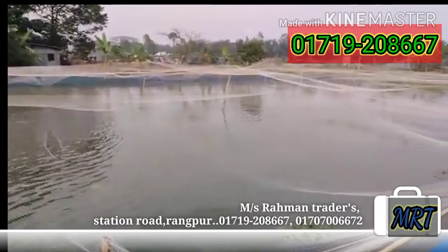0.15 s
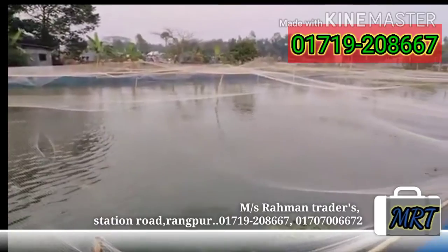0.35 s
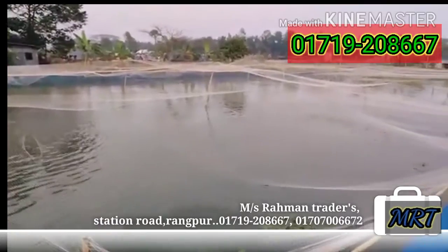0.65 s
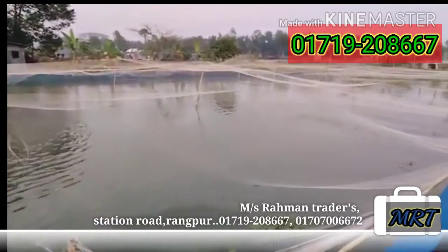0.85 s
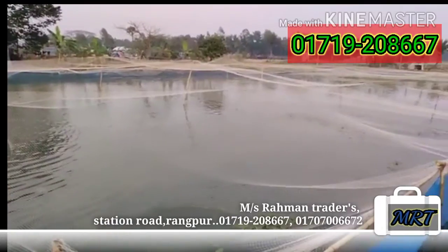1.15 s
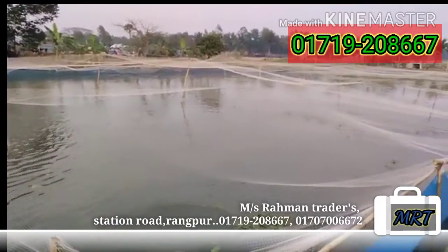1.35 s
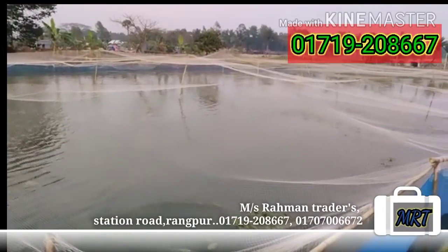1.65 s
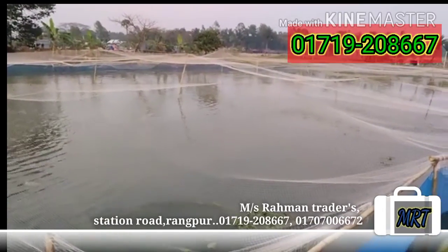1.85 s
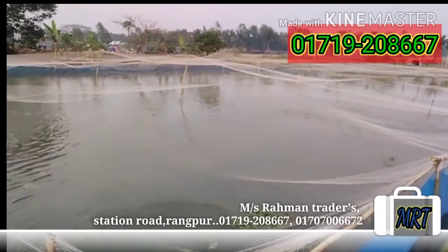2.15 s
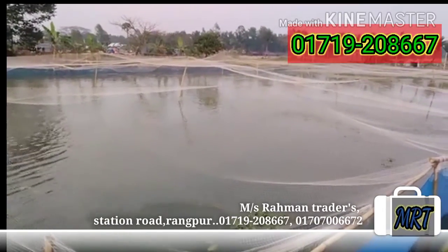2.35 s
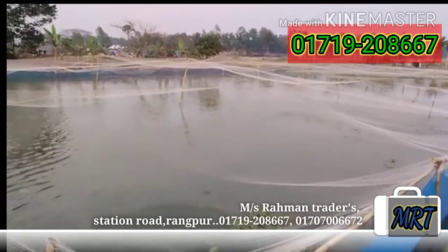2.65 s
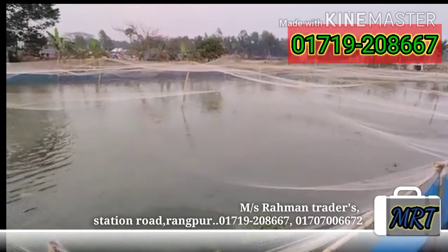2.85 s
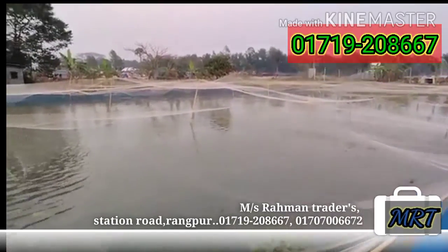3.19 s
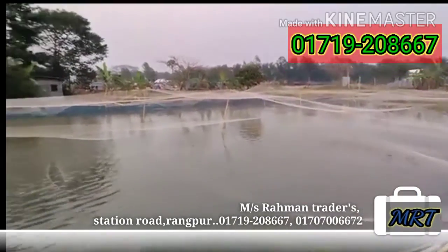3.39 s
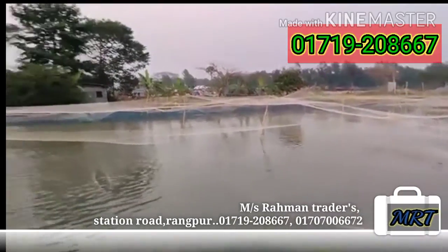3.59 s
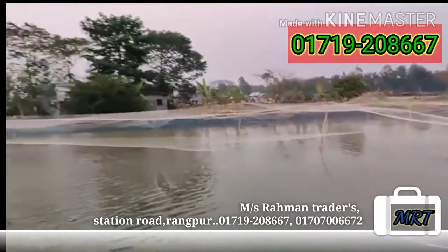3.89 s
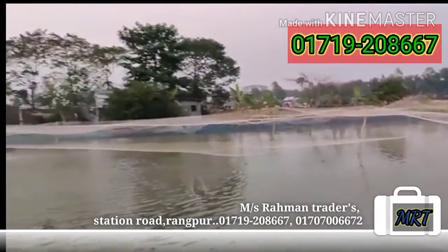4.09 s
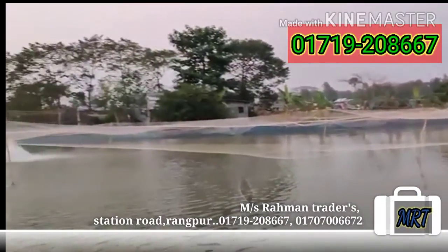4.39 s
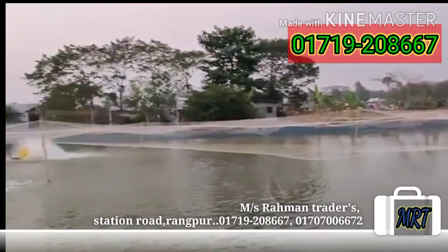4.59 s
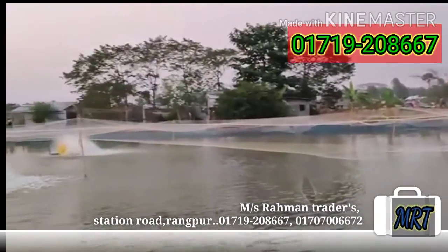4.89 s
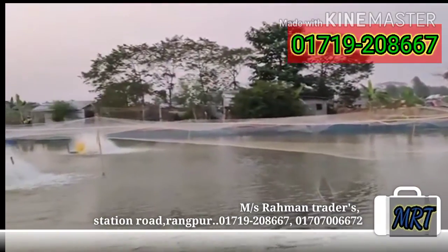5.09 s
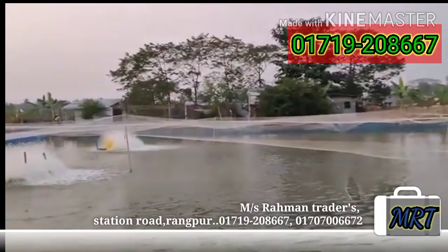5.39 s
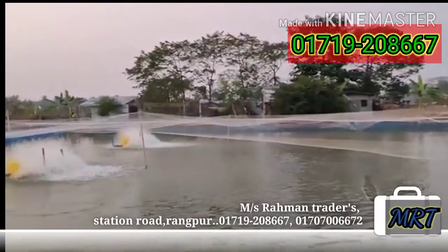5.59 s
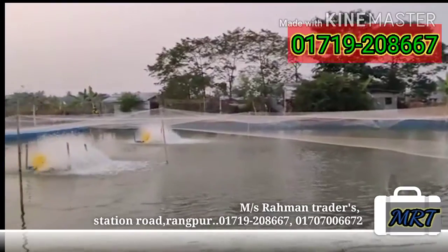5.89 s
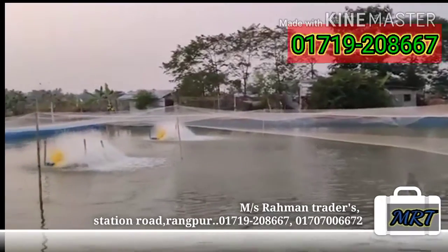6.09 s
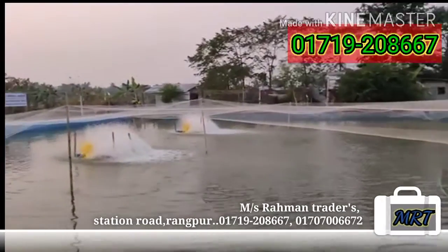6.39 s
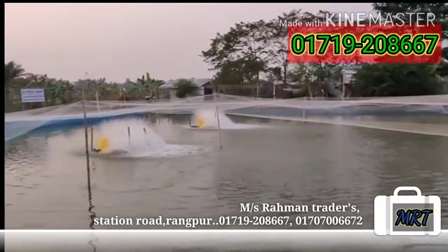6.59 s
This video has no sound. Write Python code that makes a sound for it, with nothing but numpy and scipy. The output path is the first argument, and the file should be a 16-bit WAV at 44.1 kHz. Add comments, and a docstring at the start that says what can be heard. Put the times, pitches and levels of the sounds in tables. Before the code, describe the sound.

Paddle wheel aerators churn a fish pond some way off, a dense steady rush of spray over a low wavering motor and gear hum.

```python
"""A dense rush of spray over the drone of motors and gears: paddle wheel aerators on a fish pond, some way off.
Spray is noise, drops and ringing bubbles, made uneven in time and pitch; motors and gears are wavering sines.
A hand-held phone with a microphone at each end turns slowly towards them: colour, lag and likeness of the
channels change. A few close drops splat during the turn; near the end the gear lines sink."""
import sys
import numpy as np
from scipy import signal
from scipy.fft import rfft, irfft, next_fast_len
from scipy.io import wavfile
from scipy.ndimage import map_coordinates

SR = 44100
rng = np.random.default_rng(int(sys.argv[2]) if len(sys.argv) > 2 else 0)


def transcribe(signal):
    """Save signal, clipped to [-1, 1], as a 16-bit WAV file at the path in sys.argv[1]."""
    frames = np.atleast_2d(signal).T
    limited = np.clip(frames, -1, 1)
    pcm = np.round(limited * 32767).astype(np.int16)
    wavfile.write(sys.argv[1], SR, pcm)


N = 297234
T_S = np.arange(N) / SR


def from_db(db):
    """Decibels to amplitude gain."""
    return 10 ** (np.asarray(db) / 20)


def at_hz(points, hz, column=1):
    """Table column interpolated over log frequency."""
    table = np.array(points)
    return np.interp(np.log(hz), np.log(table[:, 0]), table[:, column])


def drift(corner_hz):
    """Slow chance: noise at every 40th sample through a double one-pole low-pass; spread 1."""
    r = np.exp(-2 * np.pi * corner_hz * 40 / SR)
    noise = rng.standard_normal(N // 40 + 2002)
    slow = signal.lfilter([1], [1, -2 * r, r * r], noise)[2000:]
    slow = (slow - slow.mean()) / slow.std()
    return np.interp(np.arange(N) / 40, np.arange(len(slow)), slow)


def patches(corner_hz, hz, frames, step_s):
    """Slow chance over time, independent in every sixth of an octave; spread 1."""
    r = np.exp(-2 * np.pi * corner_hz * step_s)
    noise = rng.standard_normal((60, frames + 200))
    slow = signal.lfilter([1], [1, -2 * r, r * r], noise)[:, 200:]
    row = np.clip(6 * np.log2(hz / 30), 0, 59).astype(int)
    return (slow / slow.std())[row]


def colour(x, gain):
    """Filters x by a complex gain(Hz)."""
    size = next_fast_len(N)
    hz = np.maximum(np.arange(size // 2 + 1) * SR / size, 1)
    return irfft(rfft(x, size) * gain(hz), size)[..., :N]


def delayed(x, lag_ms):
    """Reads x later by a lag that may change."""
    return map_coordinates(x, [np.arange(N) - lag_ms * SR / 1000 + np.zeros(N)], order=3, mode="nearest")


# course of the turn, 0 away to 1 facing: t/s, share/1
TURN = [(0, 0.02), (2.0, 0), (2.9, 0.02), (3.4, 0.09), (3.9, 0.31), (4.4, 0.48), (4.9, .66), (5.5, .78),
        (6.1, 0.82), (6.74, 0.89)]


def turn():
    """Share of the turn, sample by sample."""
    return np.interp(T_S, *np.transpose(TURN))


def random_hits(rate_hz, mean_db):
    """Impulses at random moments and signs in three streams; dB sizes exponential, capped at 5 means."""
    sizes = from_db(mean_db * np.minimum(rng.exponential(1, (3, N)), 5))
    return sizes * rng.choice([-1, 1], (3, N)) * (rng.random((3, N)) < rate_hz / SR)


BUBBLES_PER_S, BUBBLE_CYCLES = 900, 27  # per stream; cycles to -60 dB
BUBBLE_SHARE = 0.16  # power, relative to the flat rush in the bubble band
BUBBLE_LOW_HZ, BUBBLE_HIGH_HZ = 684, 5320


def bubbles():
    """Trapped air bursts at random and rings at 18 pitches over about three octaves, each stream its own."""
    hits = random_hits(BUBBLES_PER_S, 1.9)
    dealt, out = rng.integers(0, 18, (3, N)), 0
    for k, hz in enumerate(np.geomspace(BUBBLE_LOW_HZ, BUBBLE_HIGH_HZ, 18)):
        r, w = from_db(-60 * hz / BUBBLE_CYCLES / SR), 2 * np.pi * hz / SR
        struck = hits * (dealt == k) + 1e-18  # offset avoids denormals
        out = out + w * signal.lfilter([0, np.sin(w)], [1, -2 * r * np.cos(w), r * r], struck)
    band_share = (BUBBLE_HIGH_HZ - BUBBLE_LOW_HZ) * 2 / SR
    return np.sqrt(BUBBLE_SHARE * band_share) * out / out.std()


DROPS_PER_S, DROP_SHARE = 3000, 0.011  # per stream; share of noise-plus-drops power


def flat_water():
    """Noise, drop impulses and bubbles in three independent streams."""
    drops = random_hits(DROPS_PER_S, 4.0)
    noise = np.sqrt(1 - DROP_SHARE) * rng.standard_normal((3, N))
    return noise + np.sqrt(DROP_SHARE) * drops / drops.std() + bubbles()


# unevenness of the rush, last column for the unshared streams when away:
# f/Hz, surge spread/dB, paddle beat/dB, quick level change spread/dB
UNEVEN = [(200, 2, 2, 1.0), (700, 0.8, 0.5, 3.5), (1380, 2.5, 2, 4), (2710, 1.5, 0.5, 5.5),
          (3500, 2.5, 1.5, 5.5), (5100, 1.15, 0.3, 0.9), (9200, 1.62, 0.3, 0.27), (14000, 2, 1, 0.5)]
PADDLES_PER_S, ODD_BLADE_SHARE = 14.0, 0.43  # mean rate; every second blade throws more water
SURGE_CORNER_HZ, QUICK_CORNER_HZ = 16.8, 12.7


def rush(turned):
    """Three streams (common, left only, right only), uneven in patches of time and pitch."""
    flat = flat_water()
    hz, s, cells = signal.stft(flat, SR, nperseg=512)
    hz = np.maximum(hz, 30)
    surge_db, beat_db, quick_db = (at_hz(UNEVEN, hz, column=k)[:, None] for k in (1, 2, 3))
    surges_db = np.array([surge_db * patches(SURGE_CORNER_HZ, hz, len(s), s[1]) for _ in flat])

    # the paddle rate wanders a little
    strikes = np.interp(s, T_S, np.cumsum(PADDLES_PER_S + 0.38 * drift(0.34)) / SR)
    # the beat has a random phase in each half octave
    offsets = rng.random(24)[(2 * np.log2(hz / 30)).astype(int), None]
    stroke = strikes + offsets
    beat = np.sin(2 * np.pi * stroke) + ODD_BLADE_SHARE * np.sin(np.pi * stroke)

    # quick patchy level changes in the unshared streams, fading over the turn
    quick_db = quick_db * (1 - np.interp(s, T_S, turned))
    mean_db = quick_db ** 2 * np.log(10) / 20  # keeps mean power
    cells[1:] *= from_db(quick_db * patches(QUICK_CORNER_HZ, hz, len(s), s[1]) - mean_db)
    cells = cells * from_db(surges_db + beat_db * beat)
    return signal.istft(cells, SR, nperseg=512)[1][:, :N]


# further phase between the channels in the treble: f/Hz, phase/rad
TREBLE_PHASE = [(4300, -0.021), (5000, -0.7), (5900, -0.1), (6200, -2), (6800, -3), (7200, 0.65),
                (8000, 1.5)]
FLIP_SHARPNESS, FIRST_FLIP_HZ = 2.7, 70  # abruptness of the band edges; width of the first


def channel_phase(hz, lag_ms, first_hz, band_hz):
    """Phase between the channels: a delay in the bass, then alternately opposite and in-phase bands."""
    bands = np.clip((hz - first_hz) / band_hz - .5, 0, 3)
    flip = np.sin(np.pi * bands) ** 2
    steps = np.round(bands) + .5 * np.sign(np.sin(2 * np.pi * bands)) * flip ** FLIP_SHARPNESS
    banded = .5 + .5 * np.tanh((hz - first_hz) / FIRST_FLIP_HZ)
    delay_phase = 2 * np.pi * hz * lag_ms / 1000
    return (1 - banded) * delay_phase + banded * np.pi * (1 + steps) + at_hz(TREBLE_PHASE, hz)


# rows away, half turned, facing: right bass lag/ms, first opposite-phase band start/Hz, band width/Hz
BEARINGS = [(0.36, 1210, 933), (0.24, 1360, 910), (0.033, 1540, 690)]
# churned water in the bass, before turn gain and ports: f/Hz, level/dB per Hz
CHURN = [(15, -74), (45, -71), (80, -67), (110, -65.5), (170, -69), (230, -66), (280, -61.5), (350, -64)]
# spray at each microphone by bearing, likewise: f/Hz, level/dB per Hz
LEFT_AWAY = [(450, -63), (540, -69), (640, -62.5), (760, -71), (1000, -72), (1280, -69.5), (1700, -68),
             (2170, -74), (2360, -65), (2900, -70), (3500, -73), (3990, -74), (4360, -68), (4800, -74),
             (5190, -69), (6900, -79), (7500, -80), (8030, -85), (9560, -82), (13560, -91), (14800, -86)]
LEFT_HALF = [(450, -65.5), (490, -73), (640, -68.5), (760, -71.5), (900, -65), (1530, -80.5), (1990, -70),
             (2170, -75), (2580, -66.5), (3660, -69.5), (4400, -70), (4800, -68), (5200, -68.5),
             (6180, -69.5), (7400, -78), (8200, -80), (8760, -83), (11390, -79.5), (14800, -88)]
LEFT_FACING = [(450, -64), (540, -75), (640, -63.5), (1400, -71), (2000, -65), (2400, -71.5), (2750, -63),
               (3500, -75), (4050, -69), (4600, -69), (5660, -67.5), (6200, -64.5), (7360, -79),
               (8760, -79), (12430, -76.5), (13560, -89), (14800, -89)]
RIGHT_AWAY = [(450, -65), (640, -63.5), (830, -72), (990, -69), (1280, -69.5), (1530, -69.5), (2580, -67.5),
              (3500, -71.5), (5190, -74.5), (6740, -71.5), (11390, -80), (13560, -75), (14800, -78)]
RIGHT_HALF = [(450, -66), (700, -70), (760, -74), (830, -64.5), (990, -67), (1180, -67.5), (2170, -71),
              (2580, -69), (4360, -76), (6180, -70.5), (8030, -80.5), (8760, -74), (12430, -82.5),
              (14800, -83.5)]
RIGHT_FACING = [(450, -69), (580, -67), (640, -69), (760, -65), (830, -61.5), (1180, -65.5), (1400, -71.5),
                (1820, -73), (3660, -74.5), (5660, -71), (8030, -79), (8760, -73.5), (12430, -78),
                (14800, -74)]
# power share of the rush common to both channels, by bearing: f/Hz, share/1
COMMON_AWAY = [(30, 0.8), (60, 0.93), (350, 1), (750, 0.73), (1000, .85), (1300, 0.9), (1750, 0.86),
               (2120, .35), (2400, 0.45), (2750, 1), (3040, 0.7), (3300, 1), (3600, .94), (3920, 0.37),
               (4250, .5), (5000, 0.25), (5600, 0.33), (6050, 0.34), (6550, 0.56), (7000, 0), (7500, 0.35),
               (8300, .1)]
COMMON_HALF = [(30, 0.96), (60, 1), (350, 0.93), (750, 0.68), (950, 0.67), (1500, 0.63), (2200, .1),
               (2600, 1), (2800, 0.75), (3150, 0.18), (3650, 0.3), (4000, 0.17), (4400, 0.27), (5000, .1),
               (7000, 0.076), (7500, 0.28), (8300, .05)]
COMMON_FACING = [(30, 0.95), (60, 1), (350, 1), (600, .86), (900, 0.99), (1200, 0.74), (1500, .1),
                 (1850, 1), (2300, 0.068), (2700, 0.24), (3100, .2), (3500, 0.26), (4000, .1), (7000, .02)]


def spray(turned):
    """Each bearing colours and mixes common and unshared streams; the turn fades from one to the next."""
    common, *unshared = rush(turned)
    spectra = [(LEFT_AWAY, LEFT_HALF, LEFT_FACING), (RIGHT_AWAY, RIGHT_HALF, RIGHT_FACING)]
    shares = (COMMON_AWAY, COMMON_HALF, COMMON_FACING)
    out = np.zeros((2, N))
    for side in range(2):
        for k in range(3):
            def gain(f):
                """Rows: common and unshared stream."""
                share = np.clip(at_hz(shares[k], f), 0, 1)
                level = from_db(at_hz(CHURN + spectra[side][k], f))
                mix = np.sqrt(SR / 2 * np.array([share, 1 - share]))
                phase = side * channel_phase(f, *BEARINGS[k])
                return level * mix * [np.exp(-1j * phase), 1 + 0 * f]
            heard = colour([common, unshared[side]], gain).sum(axis=0)
            out[side] += np.clip(1 - np.abs(2 * turned - k), 0, 1) * heard
    return out


# gear lines, away and before wavering: multiple of shaft rate/1, level/dB rms
GEARS = [(11, -51), (12, -56), (13, -52), (14, -57), (15, -54.5), (17, -54), (18, -64.5), (19, -76),
         (20, -66.5), (22, -59), (26, -57), (27, -54.5), (29, -76), (39, -53.5)]
# gain of the gear lines when facing: f/Hz, gain/dB
GEARS_FACING = [(200, 16), (300, 5.5), (400, 1.5), (700, -3), (1000, -3)]
# motor drone, away and before throb: f/Hz, level/dB rms, pitch wander/Hz, throb spread/dB, facing gain/dB
DRONE = [(32.2, -51.5, 0.73, 2.5, -4), (52.2, -47.5, 0.56, 1.8, 2), (66.2, -51, 1.47, 4, 0),
         (100.1, -50.5, 0.26, 2.5, 2.5), (203, -57, 0.87, 0, 7)]
SHAFT_HZ = 24.65
SWELL_LIMIT = 2.3  # tones dip deeply but swell only this many spreads
EASED_FROM_S, EASED_DB_PER_S = 6, -8  # gear lines sink at the end


def motors(turned):
    """Gear sines on the shaft rate and lower drone sines, wavering in level; gains follow the turn."""
    turns = np.cumsum(SHAFT_HZ + 0.029 * drift(0.357)) / SR
    out = np.zeros(N)
    for order, level_db in GEARS:
        facing_db = at_hz(GEARS_FACING, order * SHAFT_HZ)
        waver_db = 2.5 * np.minimum(drift(3.6), SWELL_LIMIT)
        cycles = order * turns + 0.1 * drift(2.8) + rng.random()
        out += from_db(level_db + facing_db * turned + waver_db) * np.sin(2 * np.pi * cycles)
    out *= from_db(EASED_DB_PER_S * np.maximum(T_S - EASED_FROM_S, 0))
    for hz, level_db, wander_hz, throb_db, facing_db in DRONE:
        cycles = np.cumsum(hz + wander_hz * drift(0.4)) / SR + rng.random()
        waver_db = throb_db * np.minimum(drift(4.9), SWELL_LIMIT)
        out += from_db(level_db + facing_db * turned + waver_db) * np.sin(2 * np.pi * cycles)
    return np.sqrt(2) * out  # rms to peak


# single close drops, left side before the port: t/s, envelope peak/dB
SPLATS = [(4.8326, -13), (4.856, -18), (5.0158, -20), (5.543, -18), (5.8887, -14), (6.06, -17),
          (6.198, -20)]
SPLAT_HZ, SPLAT_WIDTH_S = 5630, 0.00022


def splats():
    """A drop bursting close by: a bright sine puff under a Gaussian shorter than a millisecond."""
    out = np.zeros(N)
    t = np.arange(300) / SR
    puff = np.exp(-((t - .001) / SPLAT_WIDTH_S) ** 2) * np.sin(2 * np.pi * SPLAT_HZ * t)
    for s, peak_db in SPLATS:
        at = round(s * SR)
        out[at:at + len(t)] += from_db(peak_db) * puff
    return out


FACING_GAIN_DB = 0.76  # the rush gains a little on turning
HAND_ECHO_MS, HAND_ECHO_SHARE, HAND_ECHO_HZ = 0.95, 0.22, 6440  # delay, gain when facing, low-pass corner


def scene():
    """Bass and motors reach the right microphone late; on turning, the hand reflects into the left one."""
    turned = turn()
    out = from_db(FACING_GAIN_DB * turned) * spray(turned)
    dull = signal.butter(1, HAND_ECHO_HZ, fs=SR)
    out[0] += HAND_ECHO_SHARE * turned * signal.lfilter(*dull, delayed(out[0], HAND_ECHO_MS))
    hum = motors(turned)
    lag_ms = np.interp(2 * turned, range(3), np.transpose(BEARINGS)[0])
    return out + [hum, delayed(hum, lag_ms)] + splats() * from_db([[0], [-3]])


# rows left, right microphone port: f/Hz, width/Hz, lift/dB
PORTS = [(5828, 600, 14.5), (9030, 2280, 8)]
CUTOFF_HZ = 14980


def record(dry):
    """Each port lifts its own resonance; an elliptic low-pass cuts the top."""
    out = []
    for x, (hz, width_hz, lift_db) in zip(dry, PORTS):
        r = np.exp(-np.pi * width_hz / SR)
        poles = [1, -2 * r * np.cos(2 * np.pi * hz / SR), r * r]
        ring = signal.lfilter(np.array([1, 0, -1]) * (1 - r * r) / 2, poles, x)
        out.append(x + (from_db(lift_db) - 1) * ring)
    return signal.sosfilt(signal.ellip(14, .3, 75, CUTOFF_HZ, fs=SR, output="sos"), out)


dry = scene()
out = record(dry)
transcribe(out)
```